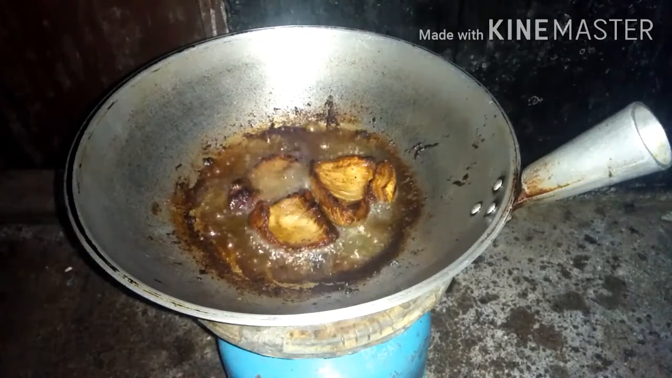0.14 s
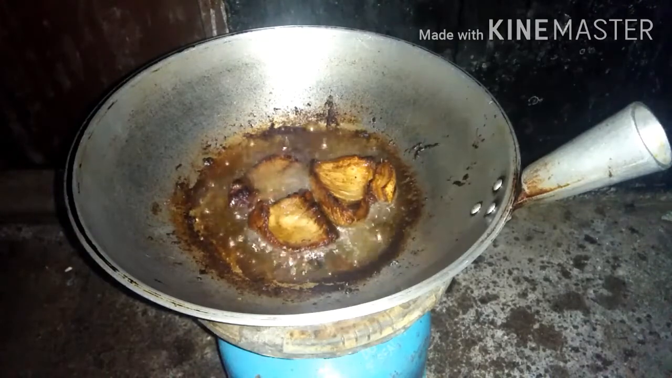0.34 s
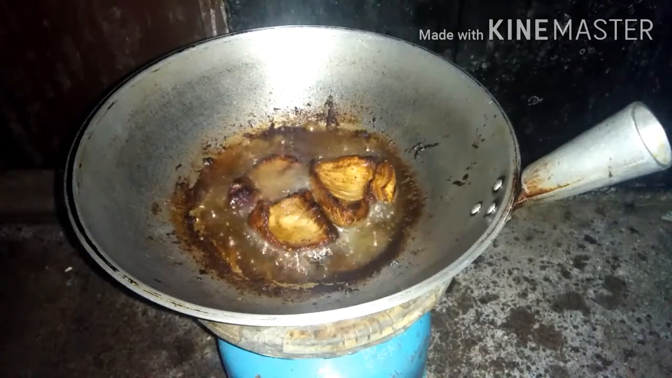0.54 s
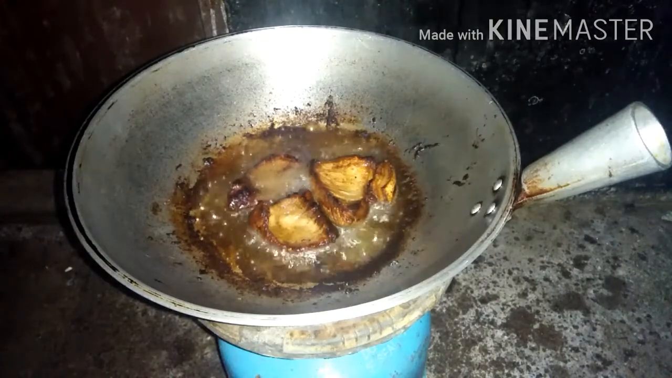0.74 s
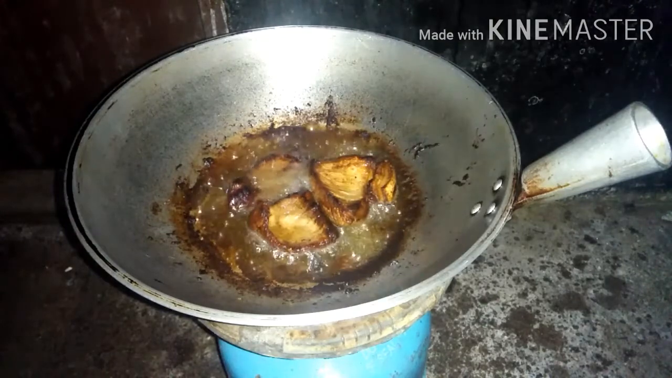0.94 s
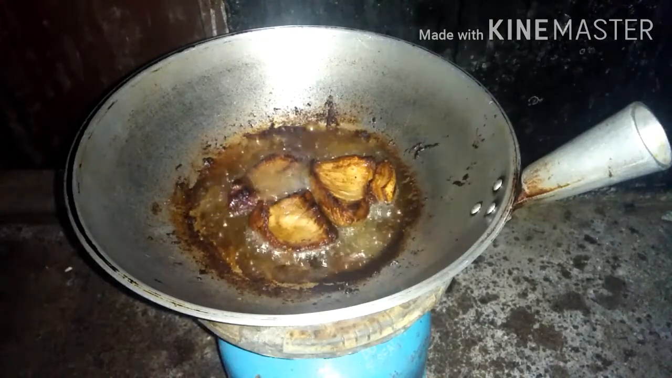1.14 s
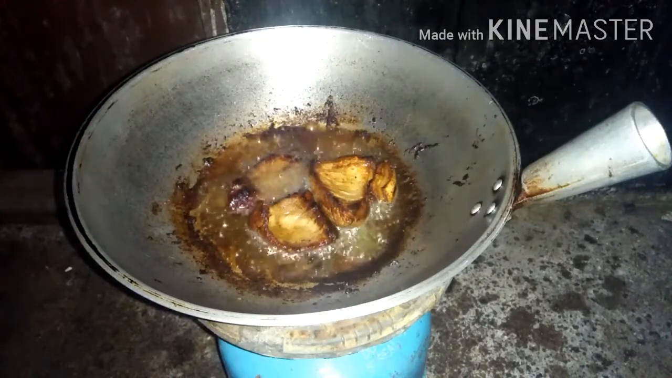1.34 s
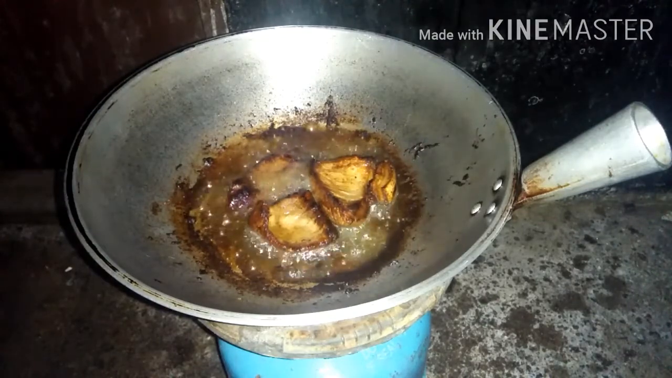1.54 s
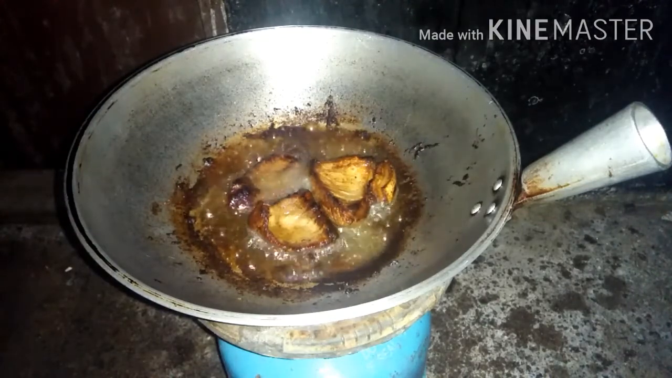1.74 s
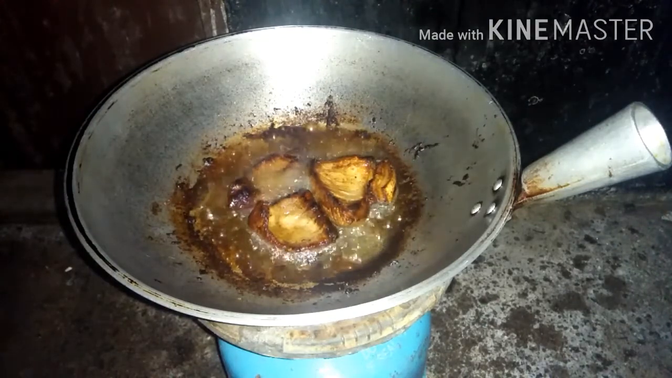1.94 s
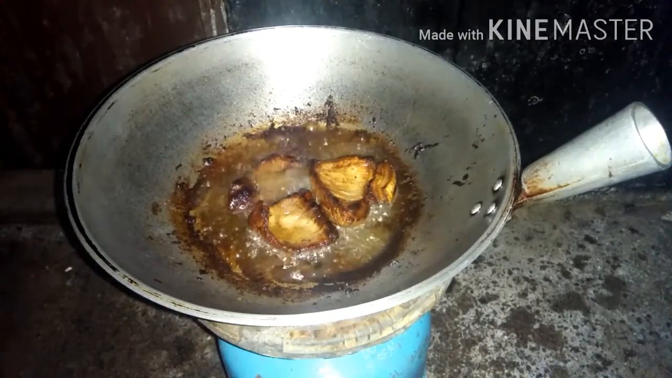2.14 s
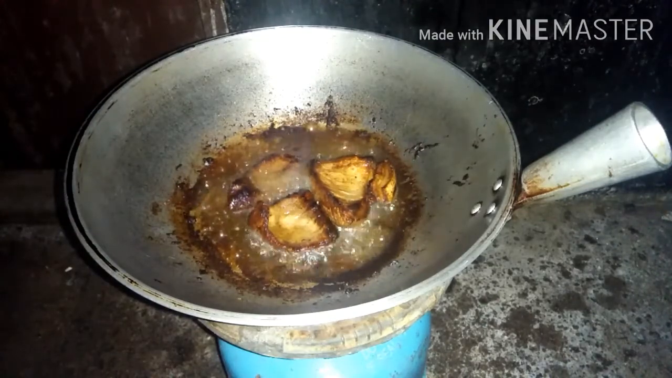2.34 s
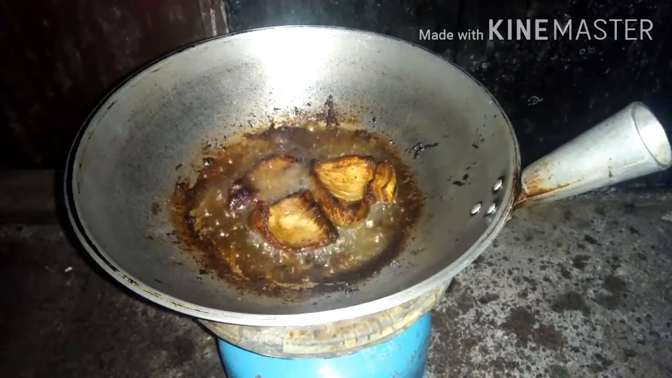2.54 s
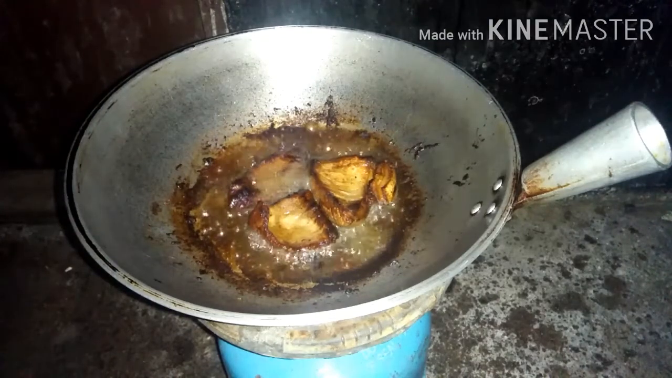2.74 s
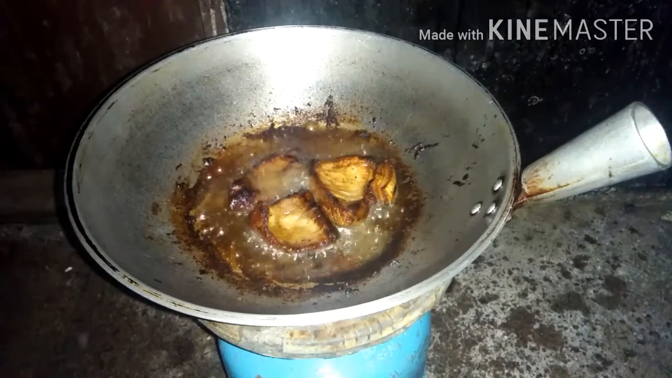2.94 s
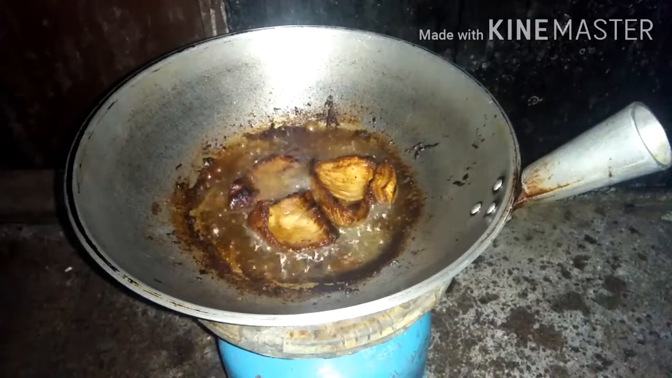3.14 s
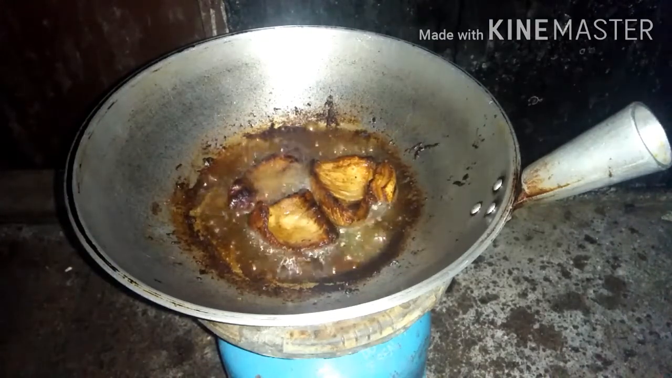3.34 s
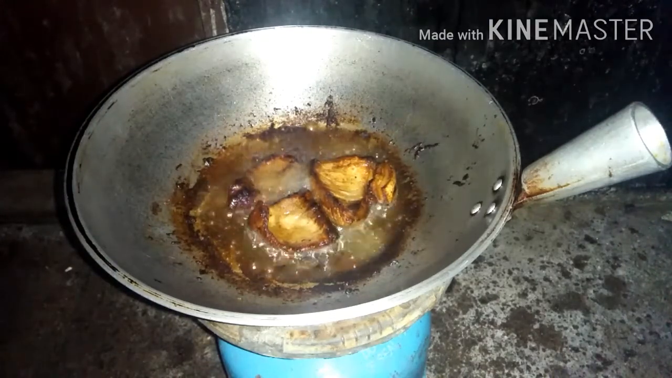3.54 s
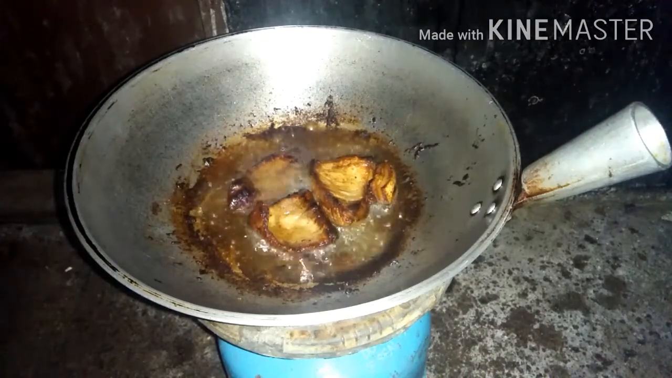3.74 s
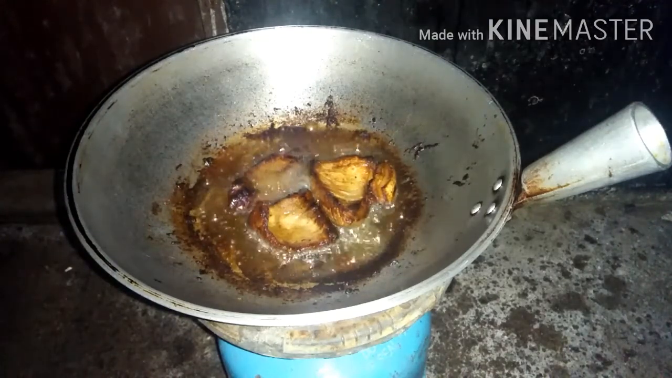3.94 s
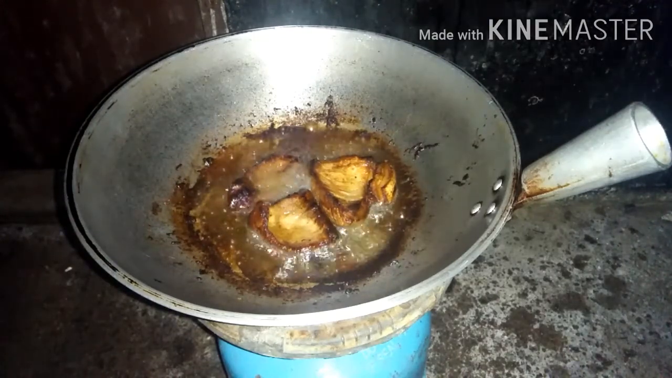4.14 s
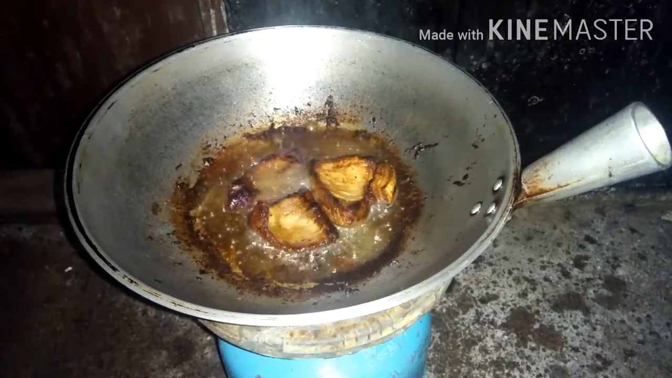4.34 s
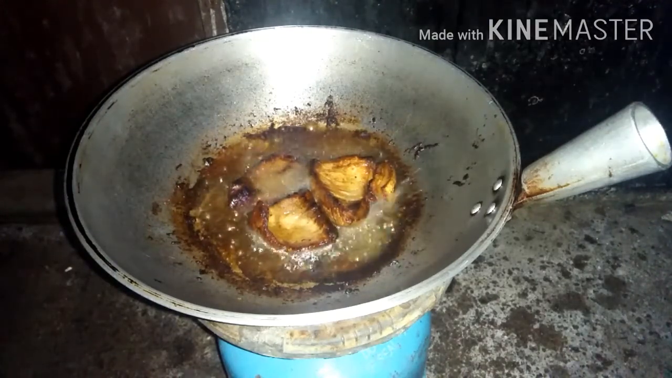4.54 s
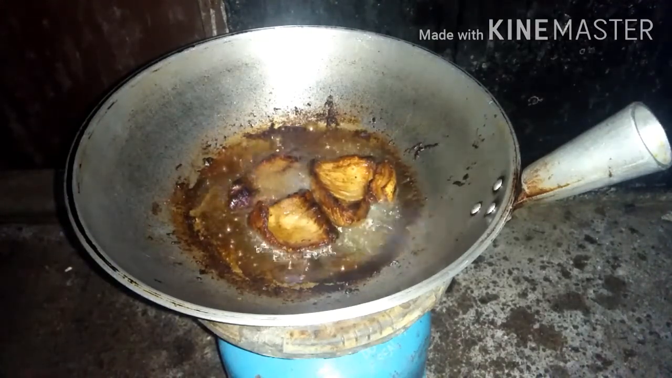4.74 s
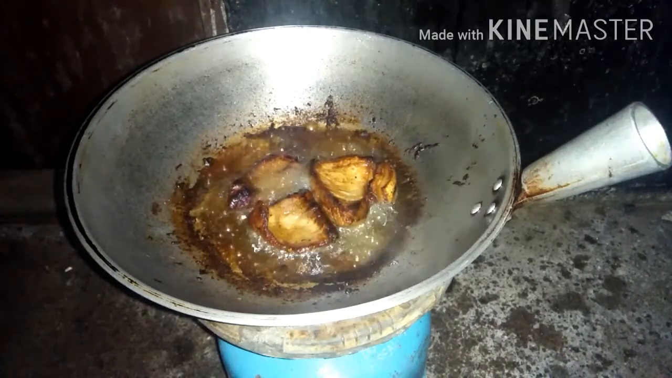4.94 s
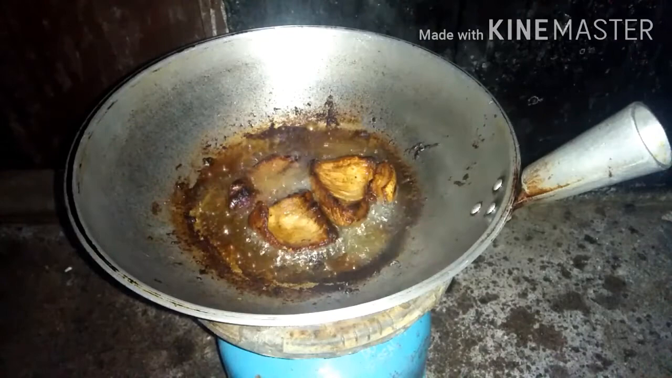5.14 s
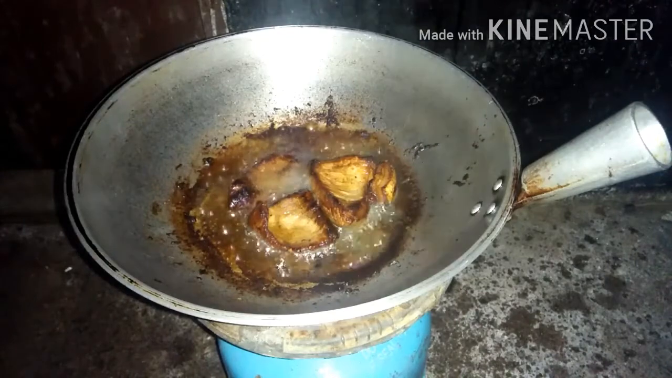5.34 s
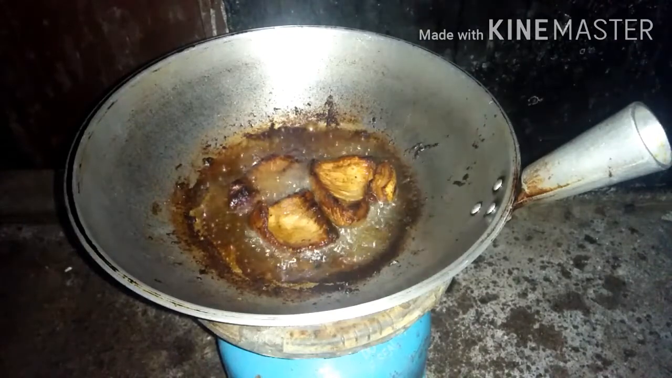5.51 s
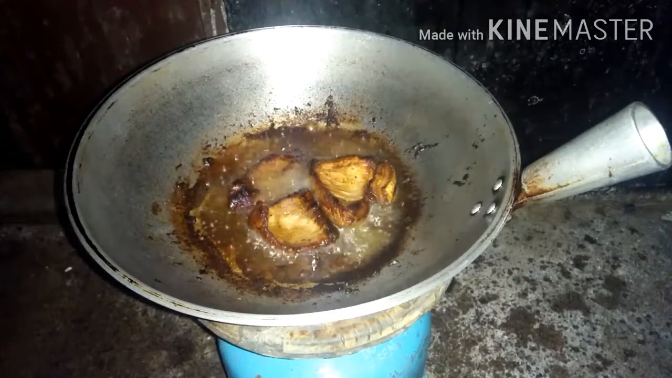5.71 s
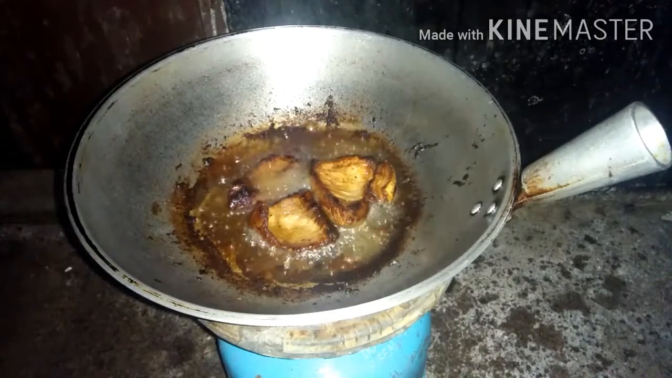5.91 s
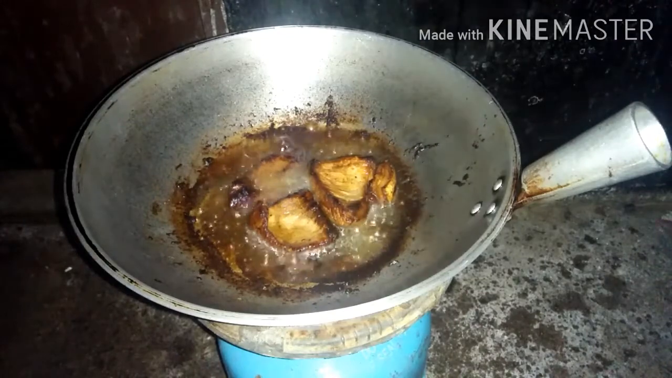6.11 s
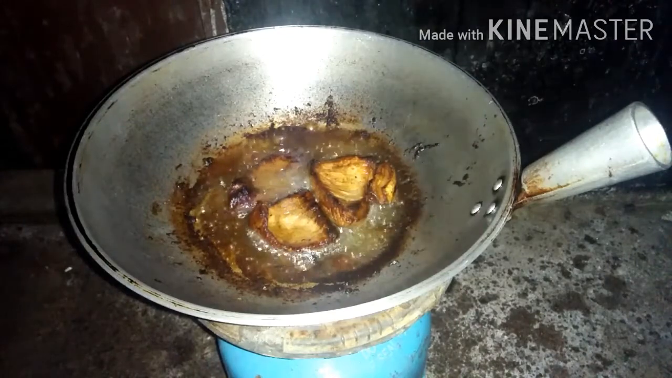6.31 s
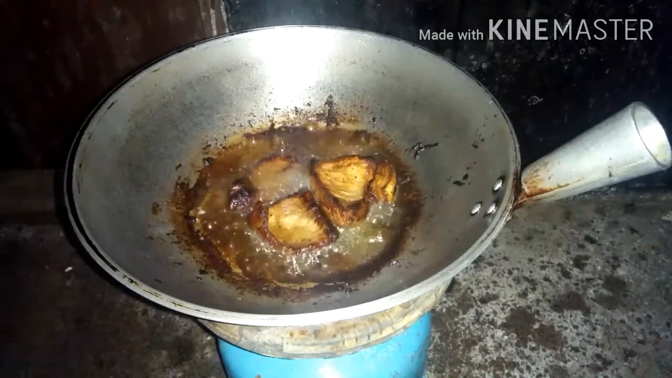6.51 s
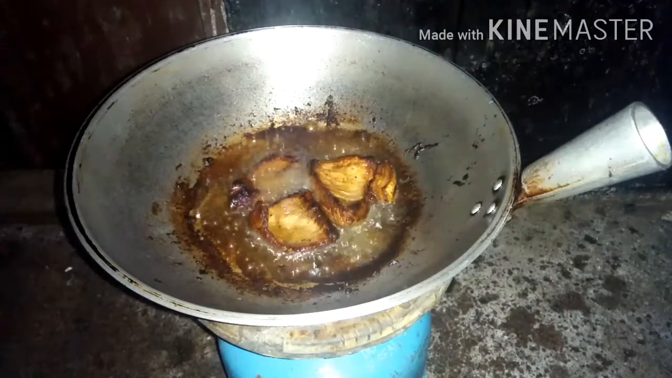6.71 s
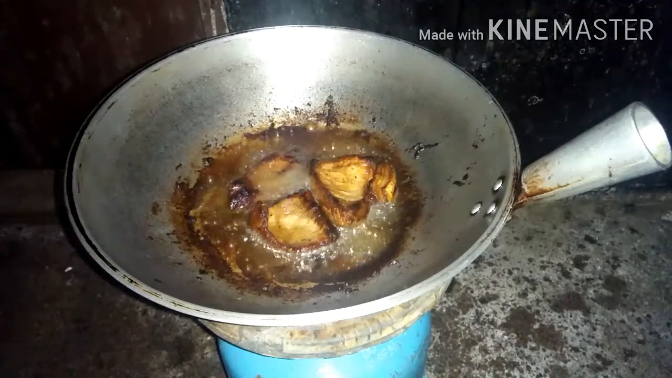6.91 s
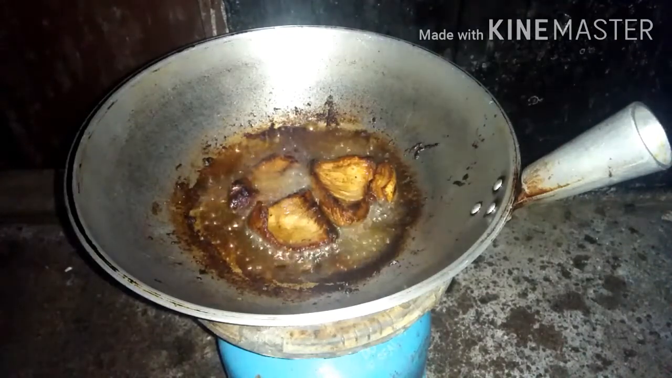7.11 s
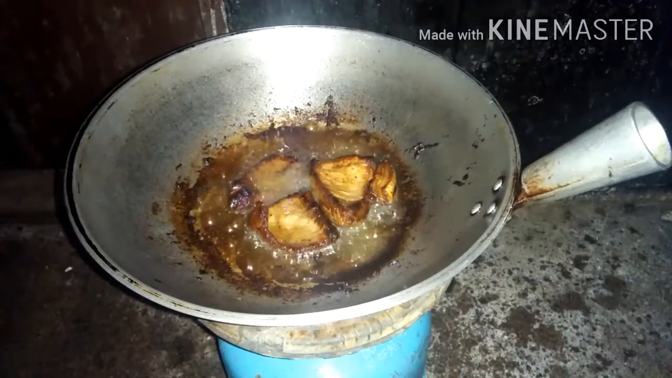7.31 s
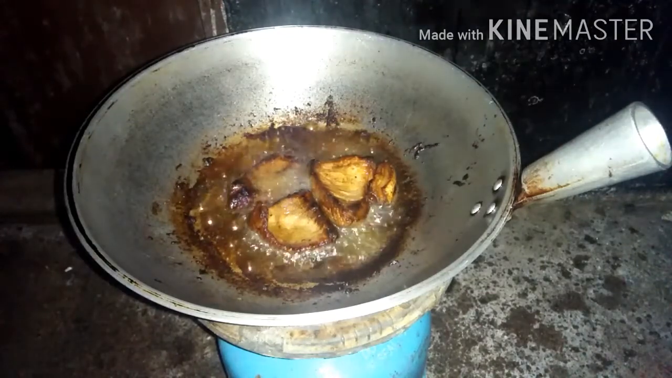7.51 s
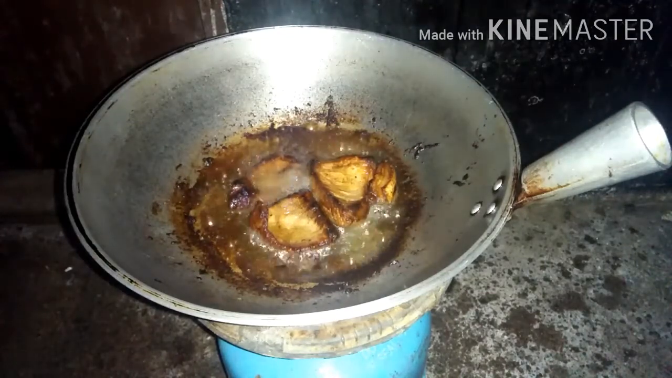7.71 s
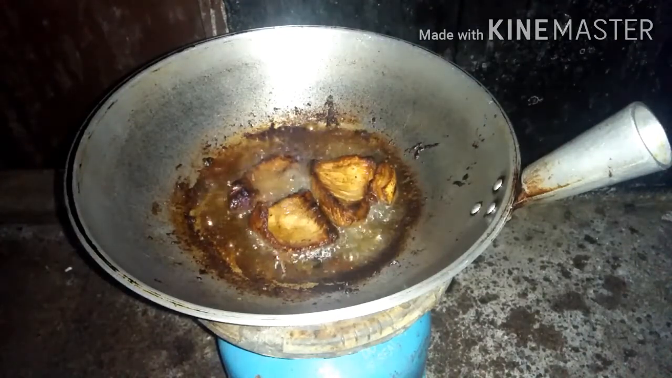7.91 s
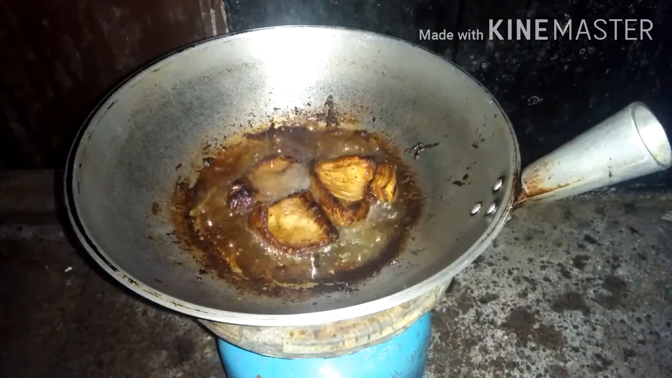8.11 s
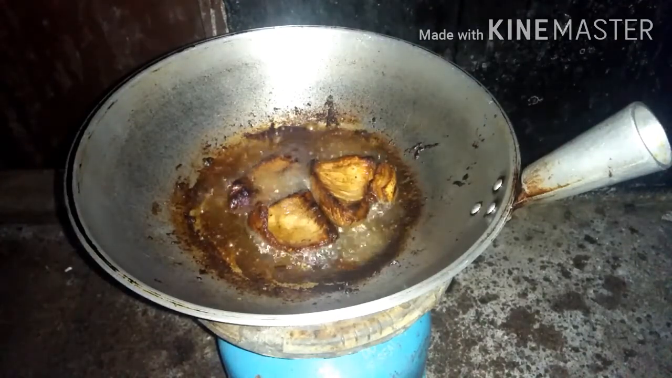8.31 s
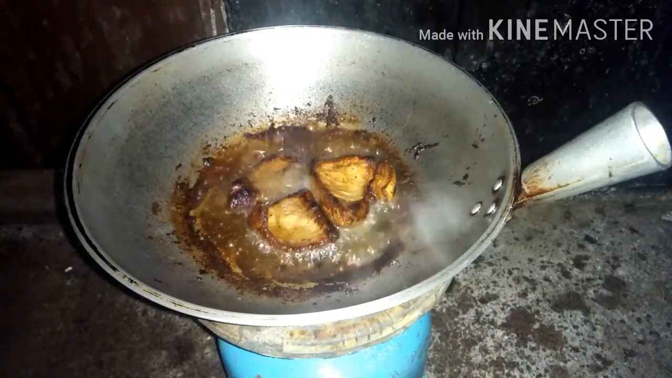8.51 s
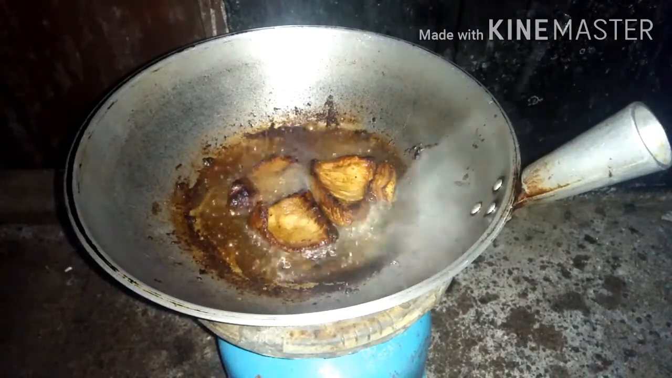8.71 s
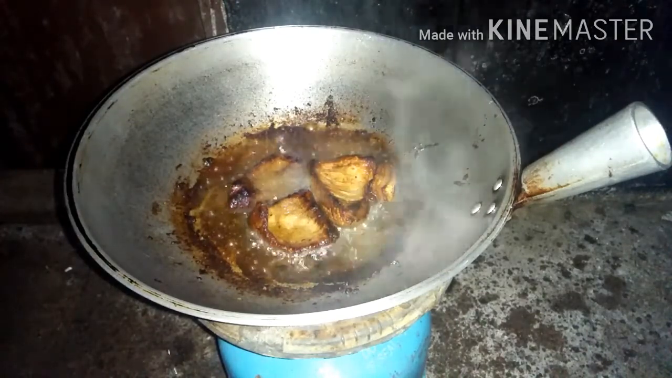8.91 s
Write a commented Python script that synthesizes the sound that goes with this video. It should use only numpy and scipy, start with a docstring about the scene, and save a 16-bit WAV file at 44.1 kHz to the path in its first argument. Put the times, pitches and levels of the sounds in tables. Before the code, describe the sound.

Close to a metal wok in a small hard-walled kitchen, pieces of meat fry in shallow hot oil. A fine, bright fizz runs throughout over simmering bubbles and a very soft rumble. Juice drops snap irregularly and hiss away, with small rising plops between. Steam bursts knock the wok at about 2.2, 4.7 and 8.6 seconds, the last with the loudest snap.

```python
"""Meat frying in a metal wok, close by, in a small hard-walled kitchen, told in order of time.
From the start tiny steam bubbles fizz and larger ones simmer (swarms of damped sines) over a soft rumble.
At once drops of juice begin to snap and boil off in fading hisses (noise bursts); soon single bubbles plop.
At 2.2, 4.7 and 8.6 s steam bursts ring the wok (noise through its modes), each leaving a lull in the boil;
the hardest snap comes with the last one."""
import sys
import numpy as np
from scipy import signal
from scipy.fft import rfft, irfft, next_fast_len
from scipy.io import wavfile
from scipy.ndimage import map_coordinates

SR = 44100
rng = np.random.default_rng(int(sys.argv[2]) if len(sys.argv) > 2 else 0)


def wav_out(sig):
    """Save sig, one row per channel (or a flat mono array), as 16-bit PCM at SR to the path in sys.argv[1]."""
    wavfile.write(sys.argv[1], SR, np.round(np.clip(np.atleast_2d(sig).T, -1, 1) * 32767).astype(np.int16))


N = 395136  # length in samples, 8.96 s


def amp(db):
    """Decibels to gain."""
    return 10 ** (np.asarray(db) / 20)


def unit(x):
    """Scale to rms 1."""
    return x / np.sqrt(np.mean(x ** 2) + 1e-20)


def along(points, hz):
    """Read a table of (f/Hz, value) points on a log frequency axis."""
    f, value = np.transpose(points)
    return np.interp(np.log(hz + 1), np.log(f + 1), value)


def wobble(rate):
    """A smooth random curve with rate knots a second."""
    knots = rng.standard_normal(int(N * rate / SR) + 4)
    return map_coordinates(knots, [np.arange(N) * rate / SR])


def filtered(x, response):
    """Multiply the spectrum of x by a response, given as a function of frequency in Hz."""
    m = next_fast_len(N + SR // 2)  # padded so that ringing does not wrap round
    return irfft(rfft(x, m) * response(np.fft.rfftfreq(m, 1 / SR)), m)[:N]


def coloured(x, spectrum, size=8192):
    """Minimum-phase filter shaped like the spectrum; white noise keeps its level."""
    gain = amp(along(spectrum, np.fft.rfftfreq(size, 1 / SR)))
    # folding the cepstrum forward in time makes the filter causal
    cepstrum = irfft(np.log(gain))
    cepstrum[1:size // 2] *= 2
    cepstrum[size // 2 + 1:] = 0
    kernel = irfft(np.exp(rfft(cepstrum)))
    return signal.fftconvolve(x, kernel / np.linalg.norm(kernel))[:N]


def fade(t, t60):
    """A decay that loses 60 dB in t60 (same unit as t)."""
    return np.exp(-np.log(1000) * t / np.maximum(t60, 1e-4))


def add(track, s, sound):
    """Mix a sound into a track at time s in seconds."""
    part = track[max(0, round(s * SR)):][:len(sound)]
    part += sound[:len(part)]


def bubbles(rate, hz, spread, cycles, size_db, size, count=1, train_s=.04):
    """Swarm of damped sines, rms 1: rate a second, losing 60 dB in cycles, in trains of like pitch."""
    # each vent draws a time, a pitch and a strength, shared by its train of count bubbles
    vents = np.repeat(rng.random((int(rate * N / SR / count), 3)), count, axis=0)
    scatter = rng.standard_normal((len(vents), 3))
    log_pitch = spread * (2 * vents[:, 1:2] - 1) + 0.036 * scatter[:, :1]
    pitch = np.minimum(hz * np.exp(log_pitch), SR / 2)
    strength_db = -size_db * np.log(np.maximum(vents[:, 2:], .02)) + 2 * scatter[:, 1:2]
    turns = pitch * np.arange(size) / SR  # time counted in cycles
    swell = 1 - np.exp(-2 * turns)
    grains = amp(strength_db) * np.sin(2 * np.pi * turns) * fade(turns, cycles) * swell
    start = (vents[:, :1] * N + train_s * SR * scatter[:, 2:]).astype(int) % N
    at = start + np.arange(size)
    return unit(np.bincount(at.ravel(), grains.ravel(), N)[:N])


# the metal bowl's modes: f/Hz, width/Hz, relative level/dB
WOK_MODES = [(291, 37, 3.5), (386, 10, 2), (461, 22, 8), (606, 32, 8), (730, 32, 6), (840, 20, -4),
             (1002, 19, -2), (1018, 55, -3), (1201, 49, 4), (1440, 48, 4), (1497, 34, -1), (1567, 18, -2),
             (1690, 13, -17), (1820, 19, -18), (2132, 70, 0.5), (3760, 250, 3)]


def wok(x, ring_db):
    """The bowl passes the sound on and adds its own resonances."""
    def modes(f):
        return sum(amp(db) * 1j * f * width / (centre * centre - f * f + 1j * f * width)
                   for centre, width, db in WOK_MODES)
    return filtered(x, lambda f: 1 + amp(ring_db) * modes(f))


# how long the hard walls ring: f/Hz, t60/s
KITCHEN_T60 = [(100, 0.35), (600, 0.31), (1500, 0.25), (4000, 0.31), (12000, 0.24)]


def kitchen(x, wet_db, gap=0.0033, block=11000):
    """Direct sound plus decaying-noise reverb, with a fresh random tail for every block."""
    echo = np.zeros(N)
    for start in range(0, N, block):
        hz, t, z = signal.stft(rng.standard_normal(SR // 2), SR, nperseg=256)
        decay = fade(t, along(KITCHEN_T60, hz)[:, None])
        tail = signal.istft(z * decay, SR, nperseg=256)[1]
        # the echo builds up over the first gap seconds
        tail = tail * np.minimum(np.arange(len(tail)) / SR / gap, 1) ** 2
        tail = tail / np.linalg.norm(tail)
        add(echo, start / SR, signal.fftconvolve(x[start:start + block], tail))
    return (x + amp(wet_db) * echo) / np.hypot(1, amp(wet_db))


DRYING_DB_PER_S = 0.1171  # the boil eases as the meat loses water
LULL_S = 0.54  # a burst vents the steam: its lull is deepest this long after it


def steam_flow():
    """Steam flow in dB: it ebbs as the meat dries, slumps after each burst and builds up again."""
    t = np.arange(N) / SR
    flow_db = -DRYING_DB_PER_S * t
    for s, *_, lull_db in BURSTS:
        age = np.maximum(t - s, 0) / LULL_S
        flow_db = flow_db - lull_db * age * np.exp(1 - age)
    return flow_db


# colour of the fine fizz: f/Hz, relative level/dB
FIZZ_SPECTRUM = [(300, -61), (1200, -22), (3000, -18), (4000, -23), (5200, -17), (6500, -15), (7600, -10),
                 (8400, -5), (9200, -4), (10200, -7), (11500, -11.5), (13000, -12.5), (14400, -23.5)]
FIZZ_DB, FIZZ_FOLLOWS = -46, 0.61  # base level; dB per dB of steam flow


def sizzle():
    """Thousands of tiny steam bubbles burst each second in a flickering fizz, with a few sharper ticks."""
    level_db = FIZZ_DB + FIZZ_FOLLOWS * steam_flow() + .7 * wobble(11)
    fizz = bubbles(rate=9000, hz=7860, spread=0.74, cycles=1.0, size_db=1.0, size=24)
    fizz = fizz * amp(1.2 * wobble(45))
    ticks = bubbles(rate=100, hz=8600, spread=0.26, cycles=17, size_db=-1.0, size=80)
    frying = coloured(fizz + amp(-24) * ticks, FIZZ_SPECTRUM)
    return amp(level_db) * unit(kitchen(frying, wet_db=-9))


# juice seeps from the meat and small bubbles well up: middle t/s, half length/s, swell level/dB
FLURRY_SWELLS = [(.47, 0.044, 4), (0.956, 0.074, 2.5), (1.41, 0.053, 3), (1.9, 0.5, 2.5), (3.318, 0.044, 3),
                 (4.077, 0.065, 5), (4.57, 0.088, 4), (5.31, 0.036, 7), (6.265, 0.18, 3.5),
                 (7.28, 0.087, 5.5), (8.245, 0.035, 2.5)]


def flurries():
    """The swell in dB of the small bubbles: each flurry rises and subsides in a bell shape."""
    t = np.arange(N) / SR
    return sum(db * np.exp(-np.minimum(((t - s) / half_s) ** 2, 20)) for s, half_s, db in FLURRY_SWELLS)


# colour of the small bubbles: f/Hz, relative level/dB
SIMMER_SPECTRUM = [(300, -9), (800, -18), (1400, -3), (2200, 4.5), (2850, 4.5), (3300, -11), (5000, 24),
                   (7000, -60)]
# colour of the large bubbles: f/Hz, relative level/dB
GURGLE_SPECTRUM = [(150, -14), (290, -8.5), (370, -24.5), (460, -5), (530, -11.5), (700, 1.5), (1000, 11),
                   (1300, -7.5), (2500, -34)]
SMALL_DB, BEADS_DB, LARGE_DB = -52.5, -59.5, -59.5  # base levels
LARGE_FOLLOWS = 1.17  # dB per dB of steam flow


def simmer():
    """Steam escapes along the meat in trains of beads, with small and large bubbles between."""
    flow_db = steam_flow()
    small_db = flow_db + flurries() + 0.37 * wobble(9)
    beads = bubbles(rate=330, hz=4786, spread=0.289, cycles=110, size_db=4, size=500,
                    count=6, train_s=.018)
    small = bubbles(rate=420, hz=1920, spread=0.552, cycles=29, size_db=3.0, size=1100)
    large = bubbles(rate=300, hz=673.0, spread=0.78, cycles=14.6, size_db=3.0, size=1600)
    beads = unit(kitchen(beads, wet_db=-7.5))
    small = unit(kitchen(wok(coloured(small, SIMMER_SPECTRUM), ring_db=-4.5), wet_db=-2.0))
    large = unit(kitchen(wok(coloured(large, GURGLE_SPECTRUM), ring_db=-4.5), wet_db=2))
    small = amp(SMALL_DB + small_db) * small
    beads = amp(BEADS_DB + small_db / 2) * beads  # beads swell half as much
    large = amp(LARGE_DB + LARGE_FOLLOWS * flow_db) * large
    return small + beads + large


# colour of the pan's low end, shared by the rumble and the burst thuds: f/Hz, relative level/dB
THUD_SPECTRUM = [(20, -14), (40, -16), (65, -2.5), (105, -2), (135, -1.5), (160, 0), (205, -13.5),
                 (280, -3.5), (600, -58), (2000, -83)]


def rumble(bumps_db=-72, murmur_db=-80.5, follows=1.9):
    """The heaving oil bumps the pan over a soft low murmur; harder boiling makes both louder."""
    bumps = bubbles(rate=45, hz=92.5, spread=0.71, cycles=6.3, size_db=3.0, size=5000)
    bumps = amp(bumps_db) * unit(coloured(bumps, THUD_SPECTRUM))
    murmur = amp(murmur_db) * unit(coloured(rng.standard_normal(N), THUD_SPECTRUM))
    return amp(follows * steam_flow()) * (bumps + murmur)


# drops of juice that flash to steam:
# t/s, relative snap level/dB, relative hiss level/dB, hiss t60/s, relative brightness/dB
SPITS = [(.005, -30, -41.5, 0.45, -2), (0.24, -32, -41.5, 0.69, -7), (.486, -29, -39.5, .4, -5),
         (.553, -31, -40, 0.42, 3), (0.641, -25, -45.5, 1.5, 1), (.852, -21, -41.5, 0.59, -7),
         (1.02, -29, -42.5, 0.38, 0), (1.28, -33, -45.5, 0.77, 2), (1.599, -36, -42.5, 0.47, -6),
         (1.97, -38, -45.5, .45, 2), (2.215, -20, -31.5, .51, 5), (2.535, -29, -42.5, 0.74, 0),
         (2.815, -41, -44.5, 0.64, -2), (3.244, -28, -42.5, 0.39, -4), (3.42, -34, -40.5, 0.76, -4),
         (3.7098, -22.5, -41, 0.8, 6), (3.863, -28, -48, 0.44, 2), (4.146, -39, -44, 0.31, -3),
         (4.3805, -17, -37.5, .55, 9.5), (4.673, -17, -38, 2, 9.5), (4.735, -34, -37.5, 0.28, 5),
         (4.95, -30, -41, 1.8, 8), (5.2568, -27, -44, 0.52, 9), (5.49, -31.5, -45, 0.67, -13),
         (5.663, -27, -40.5, 0.35, -7), (5.87, -38, -46, 0.42, -3), (6.127, -36, -46, 0.71, 3.5),
         (6.28, -41.5, -53, 0.54, 0), (6.5105, -30, -45.5, 0.37, 7), (6.86, -36.5, -45, .4, 0),
         (6.9755, -31, -45.5, 0.32, 11), (7.17, -38, -48, 0.63, -2), (7.5206, -26, -42, .28, -10),
         (7.92, -25, -42, 0.21, 2), (8.31, -40, -45, 0.61, -2), (8.484, -16.5, -38, .45, -5),
         (8.5816, -15, -39, .22, -2), (8.5835, -5.5, -31.5, 2.6, 6.5), (8.5974, -10.5, -24, 0.065, -6)]
# colour of the boiling spray: f/Hz, relative level/dB
HISS_SPECTRUM = [(300, -22), (1500, -24), (3500, -12.5), (5500, -15.5), (6700, -4), (8000, 3), (9000, 8),
                 (10200, 4.5), (11500, -8), (14400, -27.5)]
# colour of the finest spray: f/Hz, relative level/dB
MIST_SPECTRUM = [(5000, -59), (9000, -23), (11000, 3.5), (12500, 2), (14400, -11), (16000, -11),
                 (17000, -14)]
# colour of the snap: f/Hz, relative level/dB
SNAP_SPECTRUM = [(500, -34), (4000, -28), (6000, -15), (8000, -3), (9000, 0), (11000, -6), (14000, -12),
                 (17000, -30)]


def spits(snap_t60=0.0033, bounce_s=.0014, bounce_db=-10, rise_s=0.0021):
    """A drop snaps, the bowl throws the snap back, and the spray boils away."""
    snaps, edges, hiss_power, shine_power = np.zeros((4, N))
    t = np.arange(2 * SR) / SR
    for s, snap_db, hiss_db, t60, bright_db in SPITS:
        crack = rng.standard_normal(SR // 100) * fade(t[:SR // 100], snap_t60)
        crack *= 3 * amp(snap_db) / np.linalg.norm(crack)  # same energy for every draw
        add(snaps, s, crack)
        add(snaps, s + bounce_s, amp(bounce_db) * crack)
        add(edges, s, amp(bright_db - 7.5) * crack)
        spray = amp(hiss_db) * fade(t, t60) * (1 - np.exp(-t / rise_s))
        # overlapping sprays add as power
        add(hiss_power, s, spray ** 2)
        add(shine_power, s, (spray * amp(bright_db - 13.0)) ** 2)
    droplets = bubbles(rate=9000, hz=9000, spread=.45, cycles=1.5, size_db=2, size=24)
    spray_noise = unit(coloured(droplets + rng.standard_normal(N), HISS_SPECTRUM))
    body = np.sqrt(hiss_power) * spray_noise
    # finer drops sharpen the snap and add a mist at the top of the hiss
    mist = coloured(edges + np.sqrt(shine_power) * rng.standard_normal(N), MIST_SPECTRUM)
    return amp(1.0) * body + mist + kitchen(coloured(snaps, SNAP_SPECTRUM), wet_db=-11.5)


# single plopping bubbles, low to high in pitch: t/s, relative level/dB, middle of the glide f/Hz
PLOPS = [(0.238, -41, 2480), (.390, -32, 2300), (0.816, -30.5, 3020), (1.240, -41.5, 1200),
         (1.359, -29, 2720), (2.08, -38, 1190), (2.214, -36, 388), (2.215, -31, 816), (2.247, -23.5, 1080),
         (2.806, -36.5, 910), (3.154, -45.5, 710), (3.297, -33.5, 2200), (4.033, -34, 1520),
         (4.075, -34, 1780), (4.263, -34, 886), (4.484, -36, 1790), (4.665, -40.5, 440), (4.667, -45, 262),
         (4.673, -33.5, 693), (4.676, -34, 1380), (4.677, -15, 3120), (4.677, -23.5, 4300),
         (4.691, -25, 3600), (5.122, -30, 2100), (5.953, -32.5, 1980), (6.126, -37, 1080),
         (6.444, -28, 2320), (7.277, -37, 1480), (7.968, -43.5, 970), (8.449, -33, 2220),
         (8.482, -39.5, 806), (8.582, -46, 260), (8.582, -32.5, 544), (8.583, -28, 770), (8.583, -23, 1234),
         (8.585, -24.5, 3370), (8.813, -32, 974), (8.816, -38.5, 630), (8.833, -32, 960), (8.943, -38, 930)]


def plops(cycles=15, glide=0.093):
    """Each bubble swells within a cycle and rings briefly, its pitch rising as it opens."""
    track, t = np.zeros(N), np.arange(SR // 10) / SR
    for s, db, hz in PLOPS:
        life = fade(t, cycles / hz)
        pitch = hz * (1 + glide * (.5 - life))
        tone = np.sin(2 * np.pi * np.cumsum(pitch) / SR)
        swell = 1 - np.exp(-hz * t)
        add(track, s, amp(db) * life * swell * tone)
    return amp(5.5) * kitchen(wok(track, ring_db=-6.5), wet_db=-2.5)


# steam bursts that shake the wok:
# t/s, relative ring level/dB, relative thud level/dB, t60/s, depth of the lull in steam flow/dB
BURSTS = [(2.2127, -31, -55.5, 0.26, 4.5), (4.67, -50, -59, 0.16, 3), (8.5827, -53.5, -49, 0.14, 1.5)]
# colour of the blast that rings the wok: f/Hz, relative level/dB
CLANG_SPECTRUM = [(25, -36), (100, -12), (220, -41), (300, -12), (520, -19.5), (750, -3.5), (1150, -0.5),
                  (1900, 6.5), (2300, -5), (3100, -15.5), (4200, -13), (5400, -21), (12000, -38)]


def bursts(knock_db=6, knock_t60=0.013, sputter_db=1.0):
    """A trapped pocket of steam blows out with a knock and a sputter: the wok clangs and thuds."""
    ring, thud, t = np.zeros(N), np.zeros(N), np.arange(SR // 2) / SR
    for s, ring_db, thud_db, t60, _ in BURSTS:
        envelope = fade(t, t60) + amp(knock_db) * fade(t, knock_t60)
        blast = rng.standard_normal(len(t)) * envelope
        sputter = sputter_db * wobble(179)[:len(t)]
        add(ring, s, amp(ring_db + sputter) * blast)
        add(thud, s, amp(thud_db) * blast)
    clang = wok(coloured(ring, CLANG_SPECTRUM), ring_db=2)
    return kitchen(clang + coloured(thud, THUD_SPECTRUM), wet_db=-2.0)


def scene():
    """Everything comes from the wok and reaches one microphone, so both sides are alike."""
    pan = sizzle() + simmer() + rumble() + spits() + plops() + bursts()
    return np.array([pan, pan])


TOP_HZ = 14450  # band limit


def record(dry):
    """The recorder keeps nothing above its band limit."""
    return np.array([filtered(side, lambda hz: hz < TOP_HZ) for side in dry])


dry = scene()
out = record(dry)
wav_out(out)
```